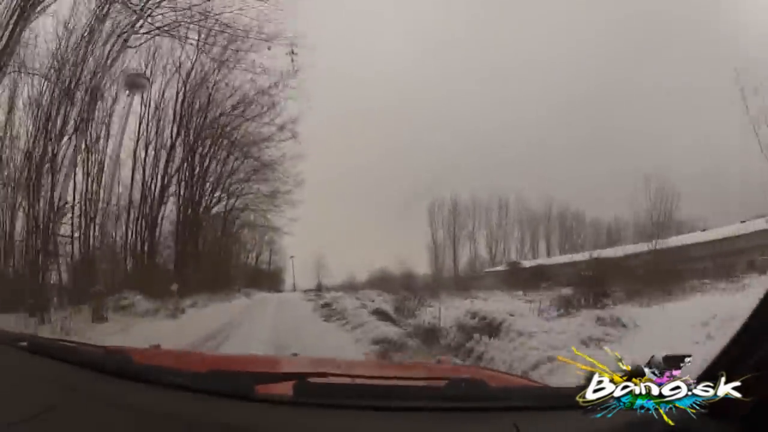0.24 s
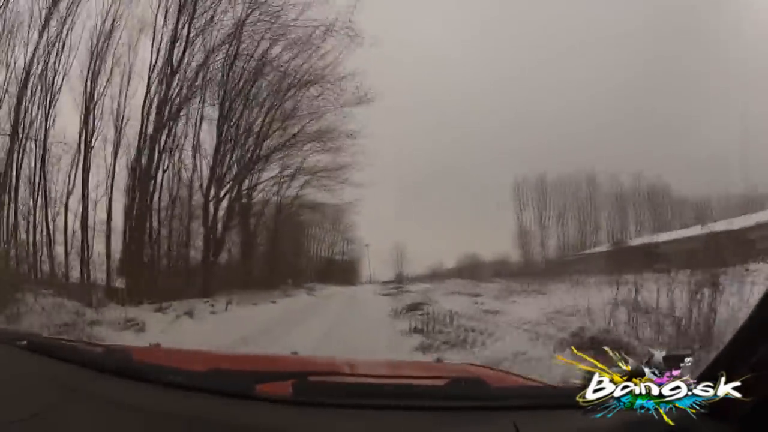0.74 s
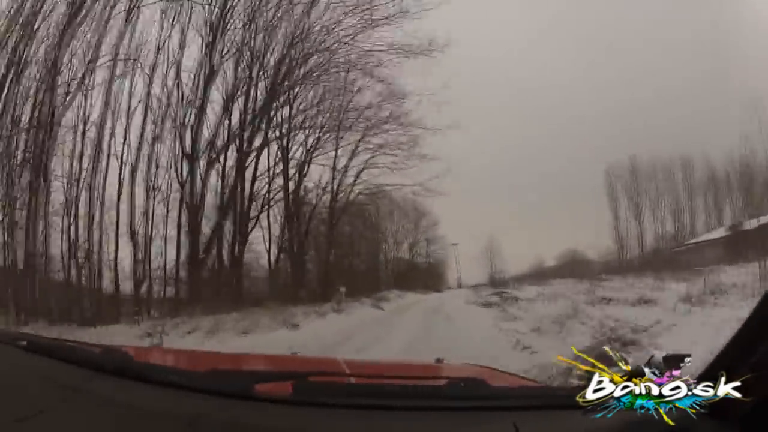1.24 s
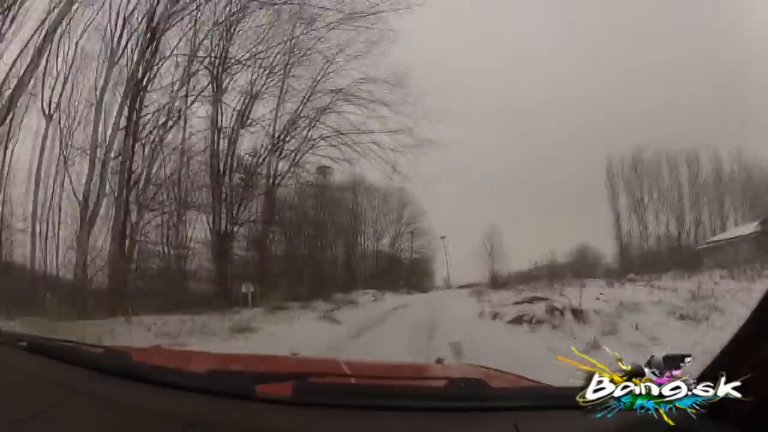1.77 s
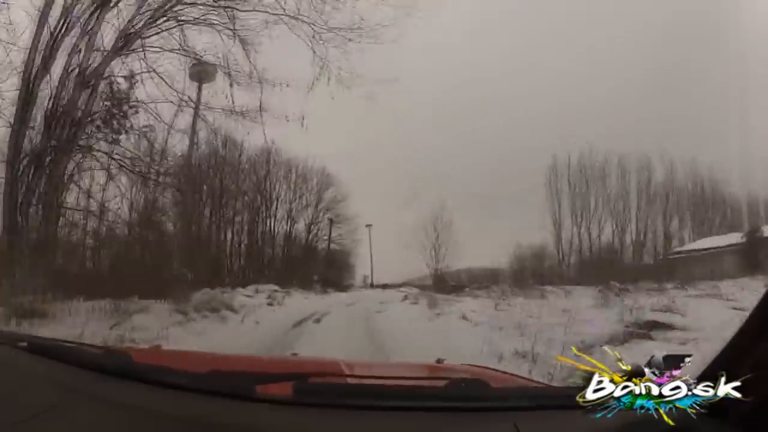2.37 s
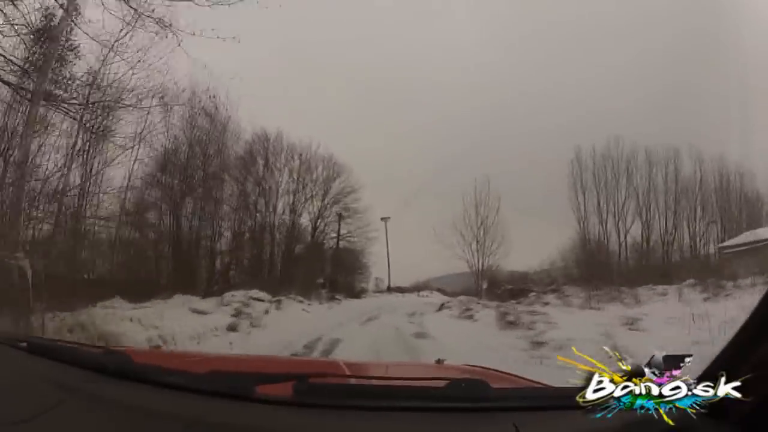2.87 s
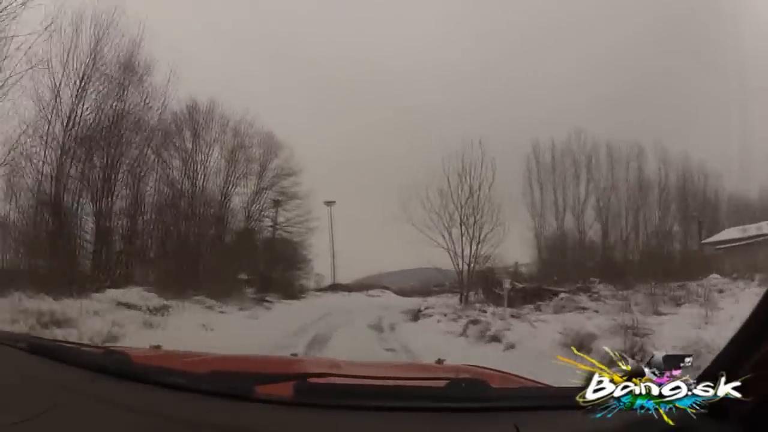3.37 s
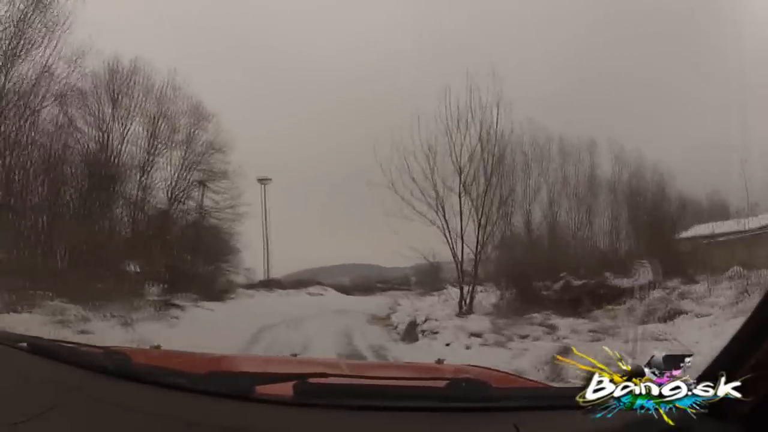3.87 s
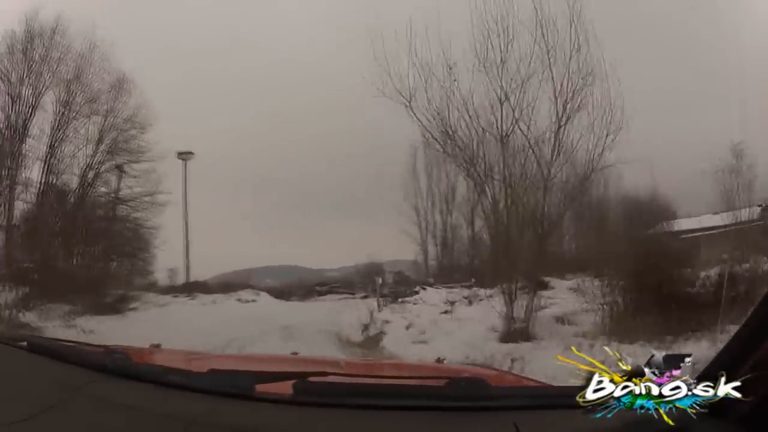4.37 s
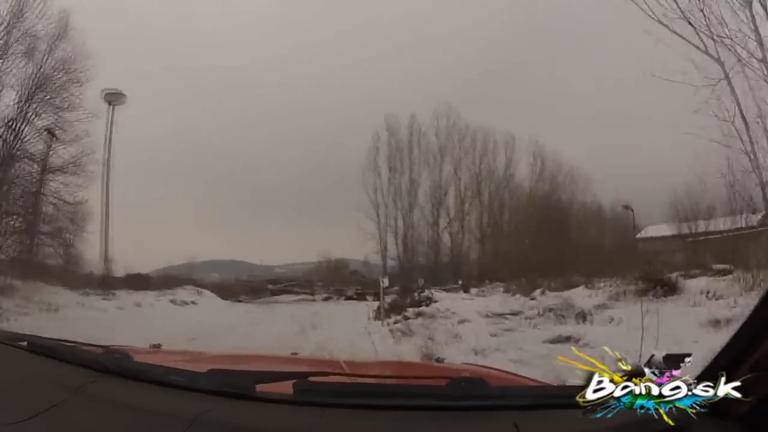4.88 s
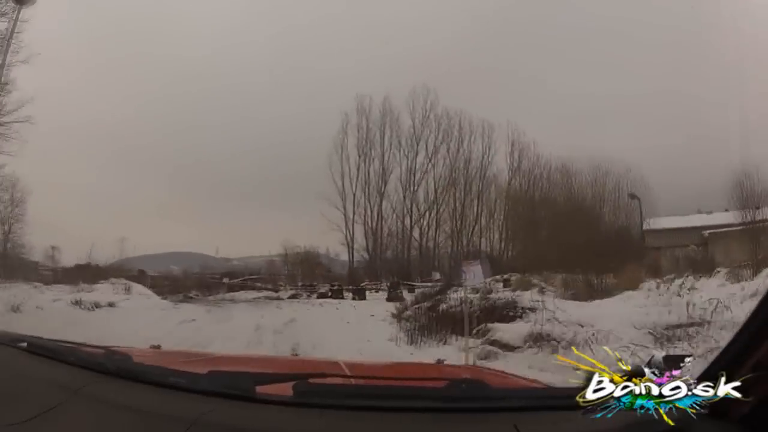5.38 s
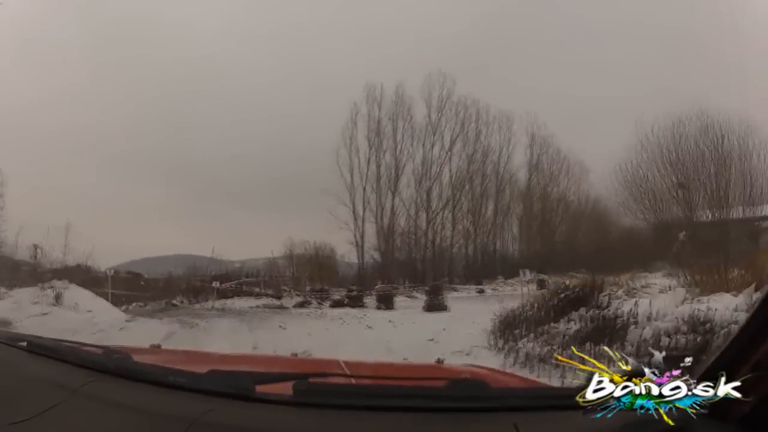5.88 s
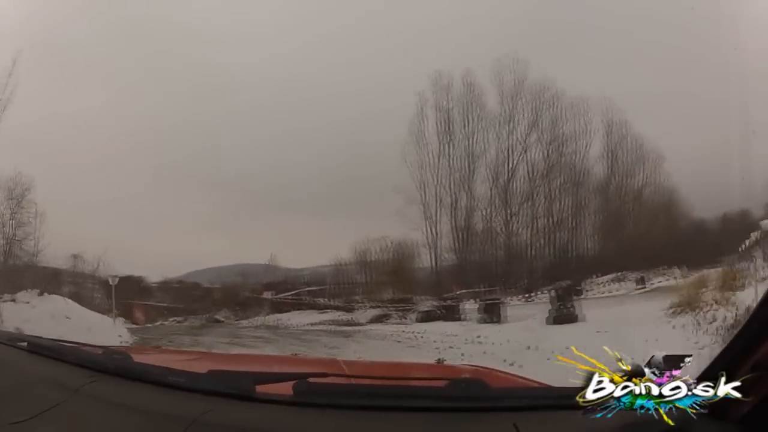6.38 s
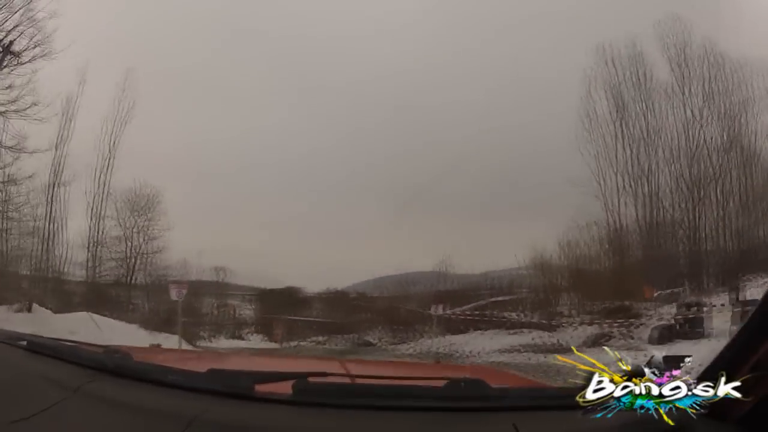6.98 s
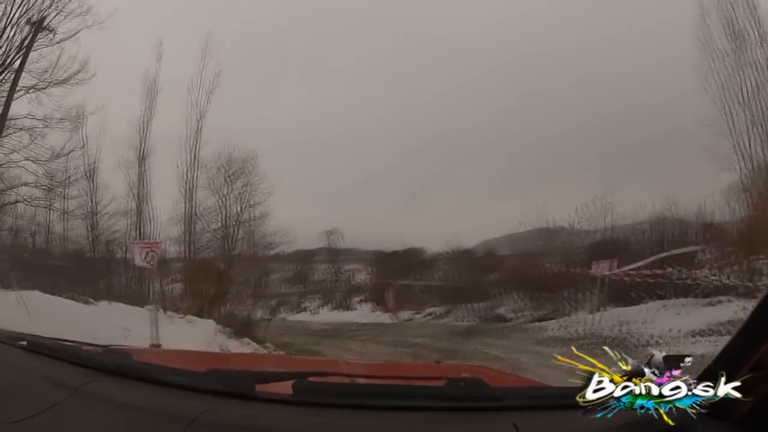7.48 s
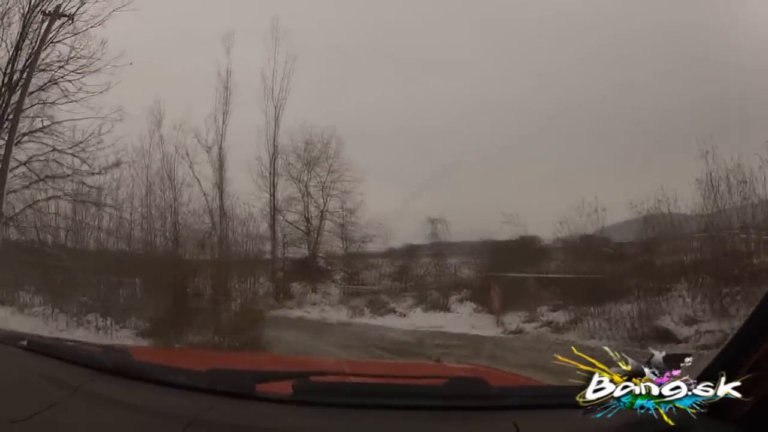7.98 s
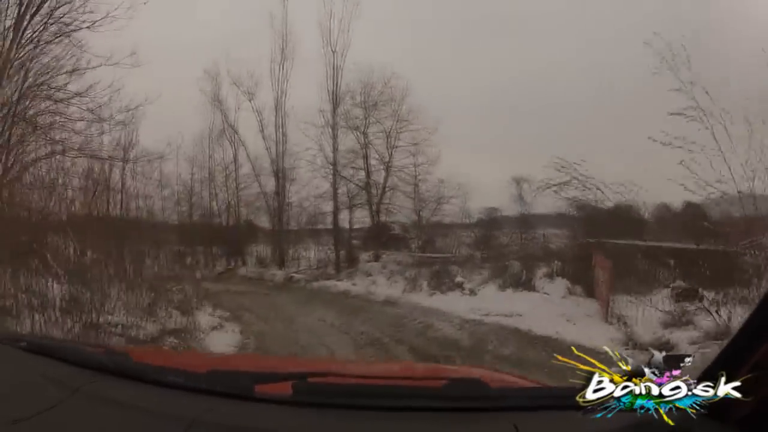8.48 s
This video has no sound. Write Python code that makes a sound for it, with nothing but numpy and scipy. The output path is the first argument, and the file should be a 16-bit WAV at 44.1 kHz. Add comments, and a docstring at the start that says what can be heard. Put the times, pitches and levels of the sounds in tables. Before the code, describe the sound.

A close, boxy car cabin shakes over rough snowy ground. Engine note and whining gears rise with the throttle and fall abruptly when it lifts, low and droning in the middle, hardest in the second half. Continuous rumble, gritty tyre roar and wet spray surround rattling fittings, booming rut jolts and metallic stone hits. The cheap dashboard microphone adds glassy fizz and overload.

```python
"""Inside a rally car on a rough, snowy track, heard by a small dashboard camera.
The revs climb early on, sink by 3 s, then surge near 5 s and 8 s: lines locked to the crank give the engine
note and gear whine. Filtered noise gives the booming body shell, tyre roar and slush throughout, and bouts
of ticks a loose fitting. Ruts set the cabin air ringing; stones ring the floor pan, thickest near 5.6 s,
with a clean snap at 8.4 s. Coarse sampling adds a glassy fizz, and overloading peaks are clipped."""
import sys
import numpy as np
from scipy import signal
from scipy.fft import rfft, irfft, next_fast_len
from scipy.io import wavfile
from scipy.ndimage import uniform_filter1d

SR = 44100
rng = np.random.default_rng(int(sys.argv[2]) if len(sys.argv) > 2 else 0)


def store_wav(level_fs):
    """Save 16-bit WAV to argv[1]."""
    pcm = np.round(np.clip(np.atleast_2d(level_fs), -1, 1) * 32767)
    wavfile.write(sys.argv[1], SR, pcm.T.astype(np.int16))


N = 384993
TIME = np.arange(N) / SR

# Engine speed. Each row: time in seconds, firing rate in Hz (two firings a turn of the crank).
FIRING_RATE = [(0, 191), (.35, 189.6), (.6, 176.3), (.9, 218.7), (1.1, 237.2), (1.35, 179.3), (1.8, 174.2),
               (2.3, 150.9), (3.1, 131), (3.9, 135.2), (4.4, 184.1), (4.75, 246), (4.87, 255.8),
               (5.2, 211.5), (5.75, 170.9), (6.3, 156.9), (6.75, 175.4), (7.15, 219.8), (7.37, 210.4),
               (7.75, 268.5), (7.9, 230.7), (8.2, 207.2), (8.45, 212.4), (8.73, 200)]
# The ground under the wheels, against an average stretch.
# Each row: time in seconds, bumpiness in dB, loose gravel in dB, slush in dB.
GROUND = [(0, -9.5, -4.5, -4), (.22, 1, -2.5, -3), (.65, -0.5, 1.5, 2), (1.3, 4, 0.5, 0.5),
          (1.55, -2.5, -1, 1.5), (2.5, 0, 4, 0.5), (3.2, -1.5, -1.5, -3), (3.75, -2, 1, -4),
          (4.03, 0.5, 5.5, 4), (4.25, -5, -5, 0), (4.75, -5.5, -5, -0.5), (5.22, -11, -5, 0),
          (5.35, 1, -1.5, 0.5), (5.62, 2.5, 10.5, 8), (5.83, 2.5, 5, 2.5), (5.95, -3, 0, 0),
          (6.4, -3.5, -5.5, -2), (6.8, -1.5, 0.5, 1), (7.25, -1.5, -0.5, 1), (7.65, -0.5, -0.5, 2.5),
          (8.05, 0, 1, 3), (8.22, 9, 5.5, 3.5), (8.73, 8, 7.5, 1)]

CRUISE_HZ = 200  # firing rate at which the levels below hold
ENGINE_DB, ENGINE_DB_PER_OCTAVE = -34, 10  # firing note when coasting; gain with revs
BOOM_DB_PER_OCTAVE = 8.5  # growth of bump noise with revs
WHEELSPIN_SHARE = 0.1  # how much of a throttle pull, in dB, the tyres add to their roar and spray
CLATTER_S = 0.01  # decay time of a stone's contacts with the pan


def amp(db):
    """Converts decibels to an amplitude ratio."""
    return 10 ** (np.asarray(db) / 20)


def evened(x):
    """Scales a signal to unit root-mean-square level."""
    return x / np.sqrt(np.mean(x ** 2) + 1e-20)


def read(points, hz):
    """A spectrum's gain at any frequency: decibels interpolated over log frequency."""
    f, db = np.transpose(points)
    return amp(np.interp(np.log(hz + 1), np.log(f + 1), db))


def curve(rows, axis=1):
    """One column of a table, interpolated linearly for every sample."""
    rows = np.asarray(rows)
    return np.interp(TIME, rows[:, 0], rows[:, axis])


def add(mix, s, sound):
    """Superposes a sound on the mix at time s."""
    part = mix[max(round(s * SR), 0):][:len(sound)]
    part += sound[:len(part)]


def colour(x, spectrum):
    """Filters a long sound by multiplying its spectrum, then sets unit level."""
    size = next_fast_len(N)
    gain = read(spectrum, np.fft.rfftfreq(size, 1 / SR))
    return evened(irfft(rfft(x, size) * gain, size)[:N])


def response(spectrum, size=1024):
    """Minimum-phase impulse response: the Hilbert transform of log gain supplies the phase."""
    log_gain = np.log(read(spectrum, abs(np.fft.fftfreq(size, 1 / SR))))
    return np.fft.ifft(np.exp(np.conj(signal.hilbert(log_gain)))).real


def wander(hz):
    """Slow random modulation: straight lines between chance values, hz of them a second."""
    knots = rng.standard_normal(8192)
    return evened(np.interp(TIME * hz, np.arange(len(knots)), knots))


def steadied(x, size=4000):
    """Divides a noise by its running level, evening slow swells but keeping quick flutter."""
    power = uniform_filter1d(uniform_filter1d(x ** 2, size), size // 2)
    return x / np.sqrt(power + 1e-12)


def grit(per_s, spread_db):
    """Shot noise: random tiny impacts, a few of them large."""
    sizes = amp(spread_db * np.minimum(rng.exponential(1, N), 4))
    return evened(sizes * rng.standard_normal(N) * (rng.random(N) < per_s / SR))


def octaves():
    """Speed as a ratio: how far the revs stand above cruising, in octaves."""
    return np.log2(curve(FIRING_RATE) / CRUISE_HZ)


def throttle():
    """Driving force: how many dB the open throttle adds, as the pedal sinks gradually and lifts at once."""
    # Each row: start in seconds, length in seconds, rise of the firing note in dB.
    pulls = [(0.787, 0.41, 5), (4.094, .77, 11.5), (6.65, .55, 5), (7.36, 0.398, 8.5), (8.207, .45, 8)]
    down_s, up_s = 0.15, .025
    total = 0
    for s, length, db in pulls:
        pressing = (TIME - s) / down_s
        lifting = (s + length - TIME) / up_s + 1
        total = total + db * np.clip(np.minimum(pressing, lifting), 0, 1)
    return total


def load():
    """Source strength of the firing note in dB: it grows with the revs and the throttle."""
    return ENGINE_DB + ENGINE_DB_PER_OCTAVE * octaves() + throttle()


def tyre_level():
    """Source strength of the tyre roar in dB: it grows with wheel speed, wheelspin and loose gravel."""
    level_db, db_per_octave = -30, 17
    return level_db + db_per_octave * octaves() + WHEELSPIN_SHARE * throttle() + curve(GROUND, axis=2)


def body(cabin_hz=133, uneven_db=0.65):
    """Forced vibration and resonance: the track shakes chassis and panels, and the cabin air rings sharply."""
    # Chassis shake and panel boom. Each row: frequency in Hz, relative gain in dB.
    shake_spectrum = [(10, -5.5), (21, 6.5), (28, 1.5), (38, -2), (55, -3.5), (72, -10.5), (88, -1.5),
                      (110, -6.5), (160, -46), (400, -65)]
    boom_spectrum = [(50, -17), (85, -3), (112, -5), (130, 2), (150, 2), (172, -6.5), (195, -1), (215, -5),
                     (240, -14.5), (290, -30), (600, -69.5)]
    # Swells in the track that heave the chassis. Each row: time in seconds, change of shake in dB.
    heave = [(0, 2), (.45, 2), (1.1, -2.5), (1.7, 4), (2.1, -3), (2.4, 1.5), (3.3, -2.5), (4.8, -1.5),
             (5.6, 3.5), (6.4, -2), (7.7, 6), (8.5, -1.5)]
    shake_db, boom_db = -21.5, -17  # boom on average ground at cruise revs
    shake = steadied(colour(rng.standard_normal(N), shake_spectrum), size=6000)
    panels, air = (colour(rng.standard_normal(N), boom_spectrum) for _ in range(2))
    air = signal.lfilter(*signal.iirpeak(cabin_hz, 15, SR), air)
    boom = steadied(panels + steadied(air, size=8000))
    bumps_db = curve(GROUND, axis=1) + uneven_db * wander(12)
    return (shake * amp(shake_db + curve(heave))
            + boom * amp(boom_db + BOOM_DB_PER_OCTAVE * octaves() + bumps_db))


def wheels(crank, throb=0.031, lumpy_db=1.0, patchy_db=1.2):
    """Shot noise of tyre roar and slush on the arches, patch by patch, amplitude-modulated by each firing."""
    # Tyre roar and slush spray. Each row: frequency in Hz, relative gain in dB.
    roar_spectrum = [(130, -37), (240, -0.5), (330, 3.5), (420, 1.5), (520, 4), (650, -2), (770, -6),
                     (860, -3.5), (980, -4.5), (1100, -16), (1240, -29), (1470, -17.5), (1620, -43),
                     (2000, -18), (5000, -47)]
    spray_spectrum = [(700, -18), (1250, -22), (1480, -10), (1620, -17), (1850, -2), (2030, -7.5),
                      (2270, 2), (2600, -7.5), (3100, -13.5), (3700, -15), (4300, -25.5), (5200, -21),
                      (6000, -32.5)]
    spray_level_db, spray_db_per_octave = -44, 12.5  # on average ground at cruise revs
    pulsing = (1 + throb * np.cos(4 * np.pi * crank)) * amp(lumpy_db * wander(60))
    roar = steadied(colour(grit(4000, 0.88) * pulsing, roar_spectrum))
    spray = steadied(colour(grit(12000, 0.58) * pulsing, spray_spectrum))
    spray_db = spray_level_db + spray_db_per_octave * octaves()
    spray_db += WHEELSPIN_SHARE * throttle() + curve(GROUND, axis=3)
    return (roar * amp(tyre_level()) + spray * amp(spray_db)) * amp(patchy_db * wander(20))


def tick(tone, rise=0.0013, bounce_db=-9, late_db=-16, tail_db=-20, tail=0.03):
    """Repeated impact: a small hard part lands with a short tick, then two weaker bounces at uneven gaps."""
    t = np.arange(1500) / SR
    starts = np.cumsum([0, rng.uniform(0.0036, 0.0065), rng.uniform(0.0055, 0.0214)])
    age = np.maximum(t - starts[:, None], 0) / rise
    contact = amp([0, bounce_db, late_db]) @ (age * np.exp(1 - age))
    contact += amp(tail_db) * np.exp(-t / tail)
    sound = signal.fftconvolve(contact * rng.standard_normal(len(t)), tone)
    return sound / abs(sound).max()


def rattle(level_db=9.5, count=16):
    """Chattering contact: the loose fitting hops nearly evenly in bouts; stray ticks are louder over bumps."""
    # Tone of the fitting. Each row: frequency in Hz, relative gain in dB.
    fitting = [(1500, -17), (2700, -10), (3300, -2.5), (3800, -1.5), (4200, 1.5), (4800, 0.5), (5300, -10),
               (6000, -15)]
    # Bouts of chatter. Each row: start in seconds, length in seconds, level in dB before level_db is added.
    bouts = [(0.055, .11, -44), (0.269, .1, -41), (0.449, .24, -41), (1.081, .26, -46), (1.386, .16, -39.5),
             (1.659, .09, -34), (1.823, .14, -41.5), (1.975, .1, -36), (2.274, .23, -40.5),
             (2.595, .15, -41), (3.472, .05, -52.5), (3.763, .03, -42), (5.147, .01, -45),
             (5.444, .07, -44), (5.588, .16, -33.5), (5.77, .22, -41.5), (6.25, .04, -40.5),
             (6.586, .06, -44.5), (6.705, .09, -38), (6.957, .2, -35), (7.624, .34, -36),
             (8.014, .17, -35.5), (8.579, .11, -35.5)]
    gap_s, jitter, spread_db = .0265, .13, 3.5  # pace of the hops; spread of log gap and of strength
    strays_per_s, stray_db = 8.7, -41.5  # level on average ground at cruise revs
    out, tone = np.zeros(N), response(fitting)
    for start, length, db in bouts:
        ticks = [tick(tone) for _ in range(count)]
        age = 0
        for sound, (timing, strength) in zip(ticks, rng.standard_normal((count, 2))):
            if age <= length:
                add(out, start + age, amp(db + level_db + spread_db * strength) * sound)
            age += gap_s * np.exp(jitter * timing)
    bumps_db = curve(GROUND, axis=1) + BOOM_DB_PER_OCTAVE * octaves()
    for at in rng.integers(0, N, round(strays_per_s * N / SR)):
        add(out, at / SR, amp(stray_db + bumps_db[at]) * tick(tone))
    return out


def strike(knock_db, crack_db, length, scatter=0.55, spot_db=2.3, rise_share=0.14):
    """Modal excitation: a stone strikes its own spot and clatters on; the pan rings low under a bright crack."""
    # Ring of the floor pan. Each row: frequency in Hz, relative level in dB, 60 dB decay time in seconds.
    pan = [(303, 5.5, 0.043), (433, -9, 0.022), (580, 8.5, 0.047), (693, 8, 0.051), (846, 13, 0.027),
           (890, 5.5, 0.012), (953, 1, 0.087), (1340, -10, 0.025), (1504, 11.5, 0.0033),
           (1930, 7.5, 0.0082)]
    # Crack of the contact. Each row: frequency in Hz, relative gain in dB.
    crack_spectrum = [(700, -19.5), (1300, -3), (1600, -9), (1900, 5), (2500, 0.5), (3300, -6),
                      (4000, -8.5), (5200, -17), (6000, -15.5)]
    t = np.arange(4096) / SR
    ring = 0
    for hz, db, t60 in pan:
        # the spot struck alters the strength of each mode
        decay = amp(db + spot_db * rng.standard_normal() - 60 * t / t60)
        ring = ring + decay * np.sin(2 * np.pi * hz * t)
    contacts = scatter * rng.standard_normal(len(t)) * (rng.random(len(t)) < 3000 / SR)
    contacts[0] = 1
    age = t / length
    contacts *= np.exp(-age) * (1 - .5 * np.exp(-age / rise_share))
    knock, crack = (signal.fftconvolve(contacts, tone)[:len(t)] for tone in (ring, response(crack_spectrum)))
    return amp(knock_db) * knock / abs(knock).max() + amp(crack_db) * crack / abs(crack).max()


def pebbles(spread_db=5.5, per_s=7, peak_knock_db=4.5, peak_crack_db=-8):
    """Random impacts: small stones fly up by chance, with peaks set against the tyre roar."""
    out, roar_db = np.zeros(N), tyre_level()
    draws = rng.random((200, 3))
    for when, low, high in draws[:round(per_s * N / SR)]:
        knock_db, crack_db = roar_db[int(when * N)] + spread_db * (2 * np.array([low, high]) - 1)
        add(out, when * N / SR, strike(knock_db + peak_knock_db, crack_db + peak_crack_db, CLATTER_S))
    return out


def ruts(cabin_hz=131, t60=0.26, rise=0.0011, level_db=2):
    """Impulse response of a damped resonator: a jolt sets the cabin booming and dying away."""
    # Jolts to the suspension. Each row: time in seconds, level in dB before level_db is added.
    jolts = [(0.476, -6), (.493, -0.5), (1.096, -15), (4.021, -9), (5.278, -8.5), (6.915, -8), (7.339, 2),
             (7.435, 1.5), (7.764, 1), (7.893, -0.5), (8.155, -2), (8.28, -7.5), (8.594, -0.5)]
    out, t = np.zeros(N), np.arange(SR // 3) / SR
    for s, db in jolts:
        swing = np.sin(2 * np.pi * cabin_hz * (1 + 0.042 * rng.standard_normal()) * t)
        add(out, s, amp(db + level_db - 60 * t / t60) * (1 - np.exp(-t / rise)) * swing)
    return out


def stones(knock_db=-1, crack_db=12):
    """Impact on a plate: big stones clatter on the floor pan, and one snaps cleanly with hardly any clatter."""
    # Each row: time in seconds, knock in dB and crack in dB, before knock_db and crack_db are added.
    hits = [(.479, -6.5, -24), (.51, -8.5, -33), (.565, -14.5, -41), (.913, -12, -44), (1.103, -17, -29.5),
            (1.409, -14, -34), (1.709, -13.5, -22.5), (2.118, -8, -27), (2.276, -18, -26),
            (2.565, -16, -35), (2.933, -17.5, -30.5), (4.007, -18, -23), (4.639, -23, -44),
            (5.445, -14.5, -37), (5.482, -14.5, -44), (5.554, -13.5, -28), (5.643, -11.5, -29),
            (5.699, -10.5, -31), (5.779, -11, -32), (5.841, -10, -32), (6.956, -11.5, -20),
            (7.153, -4.5, -33), (7.339, -10.5, -21.5), (7.444, -7, -22), (7.678, -7, -29), (7.74, -17, -33),
            (8.21, -14, -29), (8.312, -17, -43), (8.338, -2, -44), (8.503, -2.5, -28), (8.548, -20, -24)]
    out = np.zeros(N)
    for s, low_db, high_db in hits:
        add(out, s, strike(low_db + knock_db, high_db + crack_db, CLATTER_S))
    add(out, 8.38, strike(-10 + knock_db, -12.5 + crack_db, length=0.0029))  # the clean snap
    return out


def order(crank, crank_hz, multiple, rough):
    """A harmonic locked to the crank, heard through the bulkhead; higher ones fade and jitter more."""
    # Path from the engine into the cabin. Each row: frequency in Hz, gain in dB.
    bulkhead = [(130, 0), (260, 0), (295, -4), (340, 2), (390, -6), (450, -2), (560, -4), (645, 3),
                (720, -5), (800, -7), (920, -2), (1080, -9), (1240, -24), (1480, -16), (1620, -24),
                (2250, -7), (3000, -18)]
    unsteady = min(multiple / 5, 1)
    cycles = multiple * crank + rng.random() + .09 * unsteady * wander(45)
    tone = np.cos(2 * np.pi * cycles)
    fading = evened(amp(3.5 * unsteady * wander(9)) * (1 + rough * wander(60)))
    return read(bulkhead, crank_hz * multiple) * fading * tone


def gearbox(crank, rough=0.8, level_db=-46, db_per_octave=14, load_share=.5):
    """Gear-mesh tones locked to the crank whine louder the faster they turn and the harder they are driven."""
    # Each row: multiple of the crank rate, relative level in dB.
    meshes = [(2.32, -4), (3.35, -4), (4.65, 0), (5.35, 1), (7.33, 1), (8.57, -3), (10.8, -3)]
    crank_hz = curve(FIRING_RATE) / 2
    whine = sum(amp(db) * order(crank, crank_hz, k, rough) for k, db in meshes)
    return whine * amp(level_db + db_per_octave * octaves() + load_share * (load() - ENGINE_DB))


def engine(crank):
    """Harmonic series of crank orders, fluttering with uneven firing; resonance makes the cabin drone at low revs."""
    # Strength of the crank orders. Each row: multiple of the crank rate, relative level in dB.
    strengths = [(1, -14), (1.5, -15), (2, 0), (2.5, -20), (3, -18), (3.5, -21), (4, -11), (4.5, -19),
                 (5, -10), (5.5, -21), (6, -12), (6.5, -21), (8, -16), (22, -24)]
    drone_db, drone_hz, drone_width_hz = -22.5, 141, 13.5  # air resonance: gain, firing rate, half-width
    firing_hz = curve(FIRING_RATE)
    multiples, dbs = np.transpose(strengths)
    half_orders = np.arange(2, 45) / 2
    note = sum(amp(np.interp(k, multiples, dbs)) * order(crank, firing_hz / 2, k, .25) for k in half_orders)
    resonance = 1 / (1 + ((firing_hz - drone_hz) / drone_width_hz) ** 2)
    drone = order(crank, firing_hz / 2, 2, .25) * resonance
    return amp(load()) * evened(note) + amp(drone_db) * drone


def scene():
    """Superposition of all sources at the dashboard; wheel slip makes the revs waver."""
    crank = np.cumsum(curve(FIRING_RATE) / 2 * (1 + .004 * wander(25))) / SR  # turns
    background = body() + wheels(crank) + rattle()
    impacts = pebbles() + ruts() + stones()
    return (background + impacts + gearbox(crank) + engine(crank))[None]


def record(dry):
    """Sample and hold: at 12 kHz, with clipping, holding each sample mirrors the sound into the treble."""
    coarse = np.clip(signal.resample_poly(dry, 40, 147, axis=1), -1, 1)
    held = np.repeat(coarse, 4, axis=1)  # now at 48 kHz
    held = signal.resample_poly(held, 147, 160, axis=1)[:, :N]
    lowpass = signal.firwin(255, 15300, window=("kaiser", 8), fs=SR)  # cutoff in Hz
    return signal.oaconvolve(held, lowpass[None], "same")


dry = scene()
out = record(dry)
store_wav(out)
```